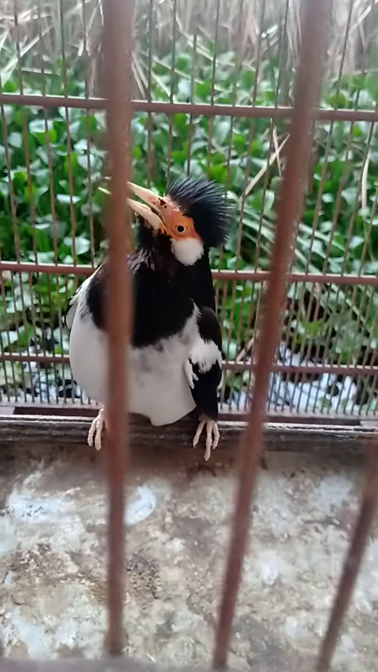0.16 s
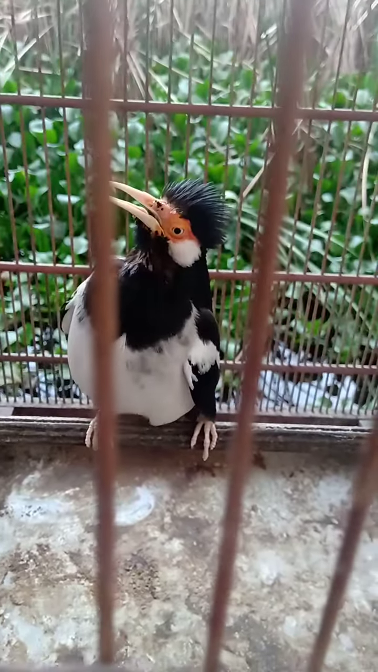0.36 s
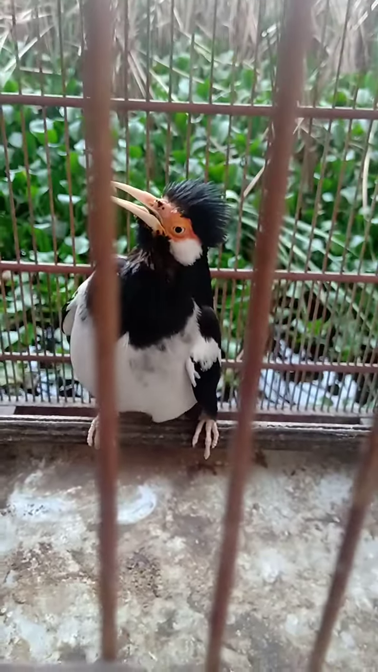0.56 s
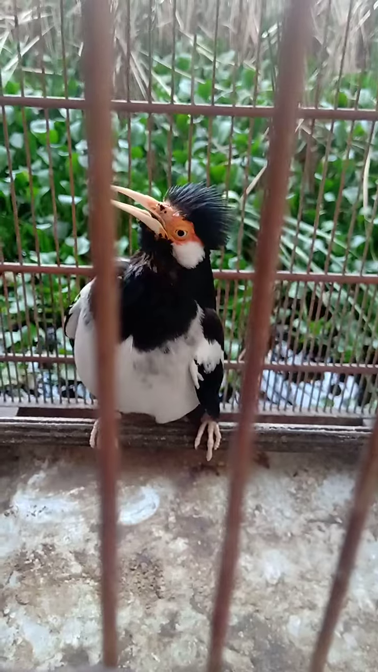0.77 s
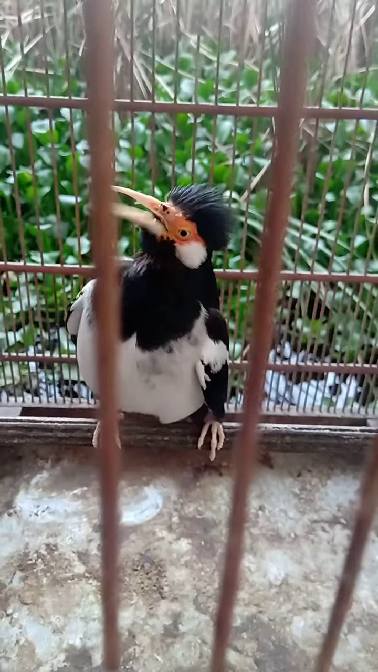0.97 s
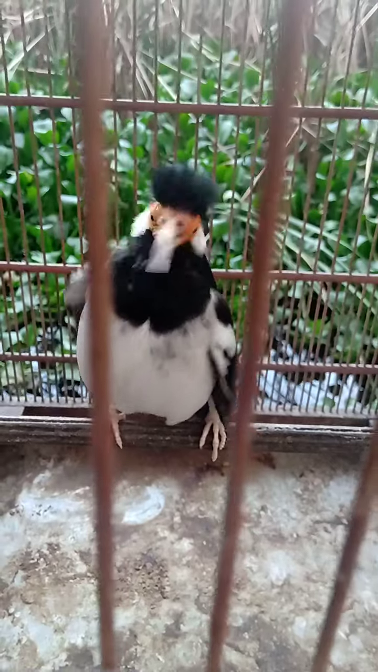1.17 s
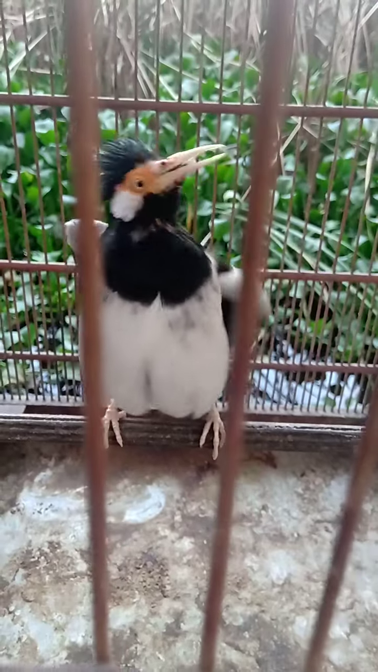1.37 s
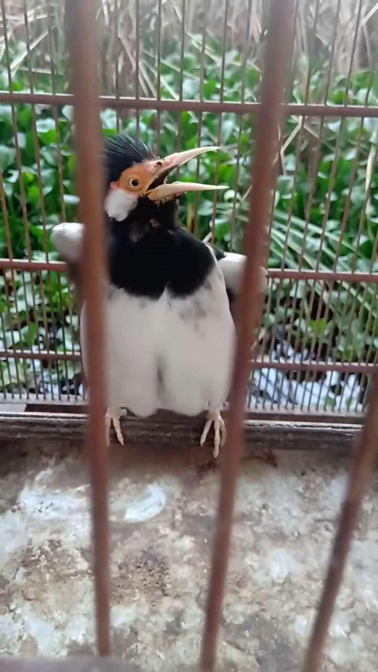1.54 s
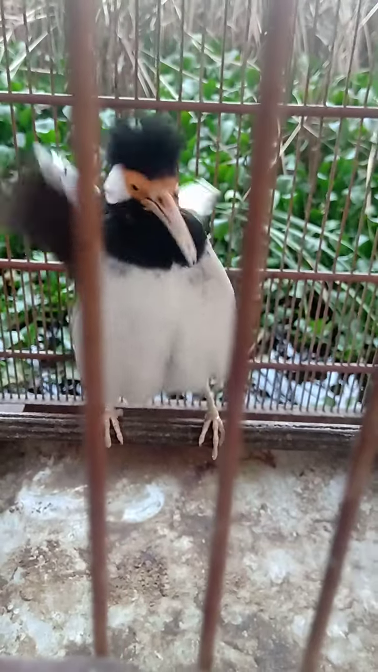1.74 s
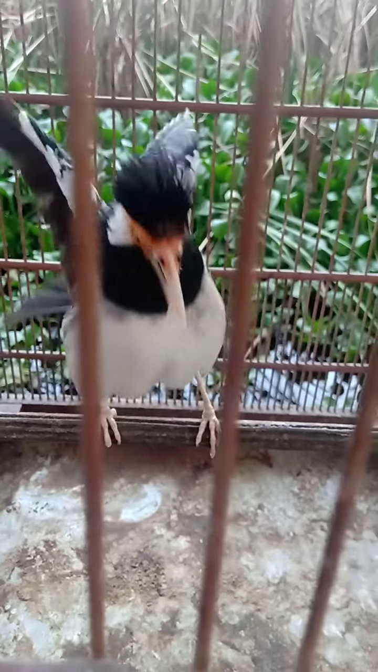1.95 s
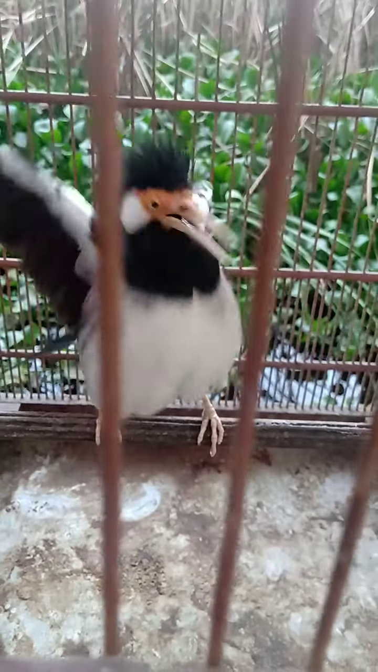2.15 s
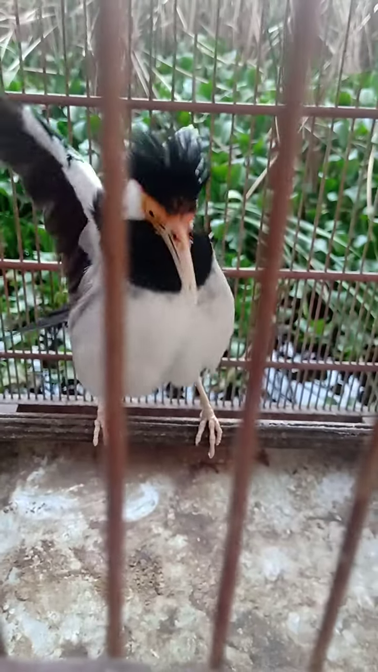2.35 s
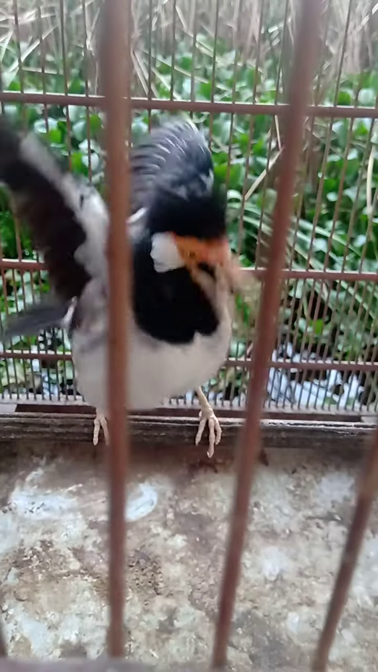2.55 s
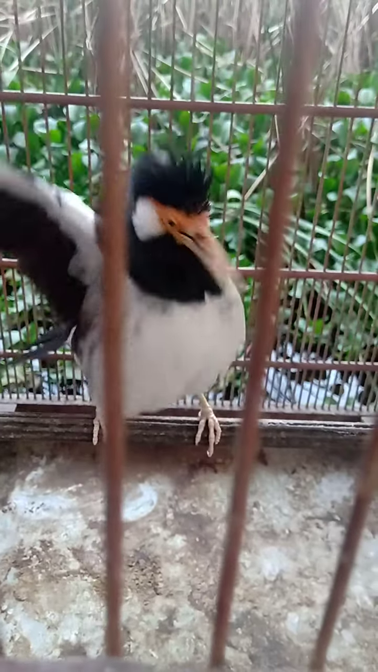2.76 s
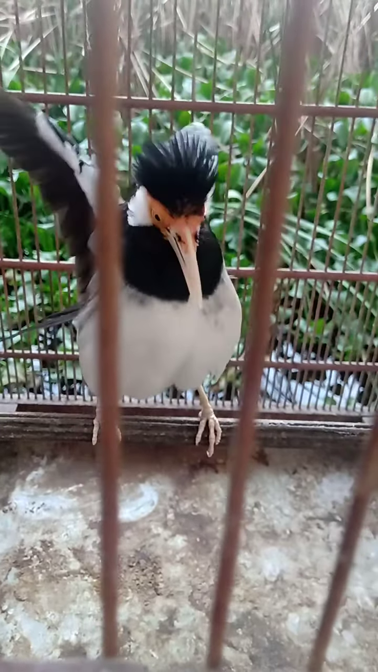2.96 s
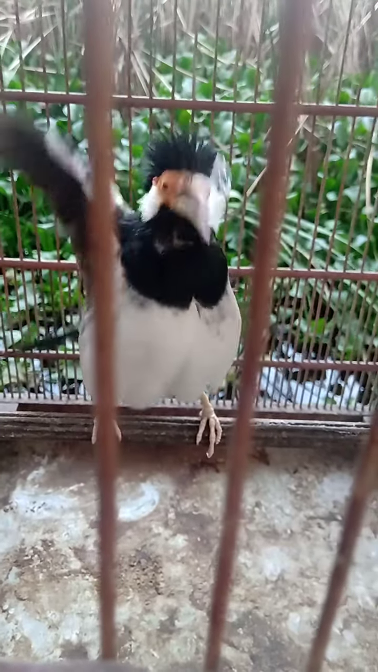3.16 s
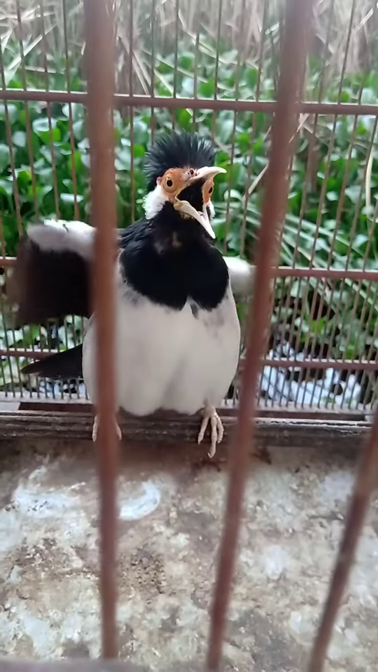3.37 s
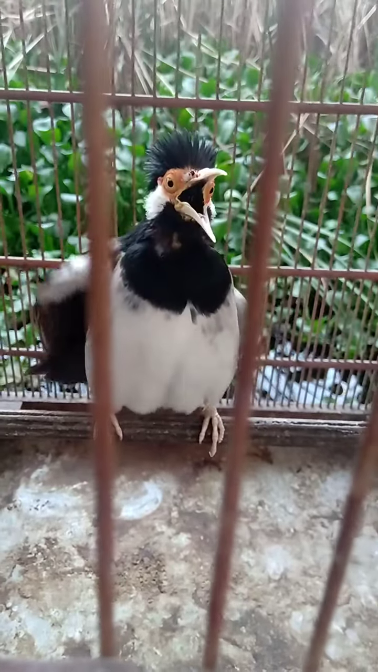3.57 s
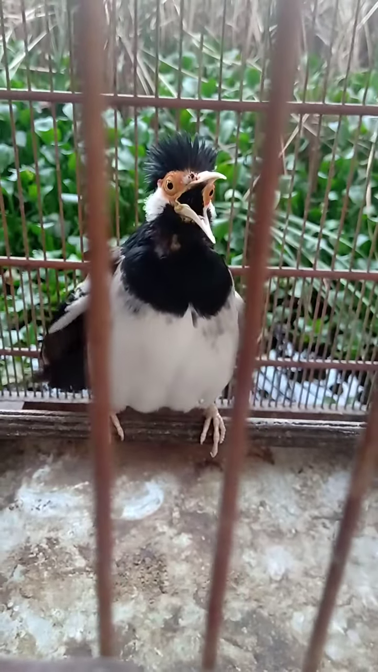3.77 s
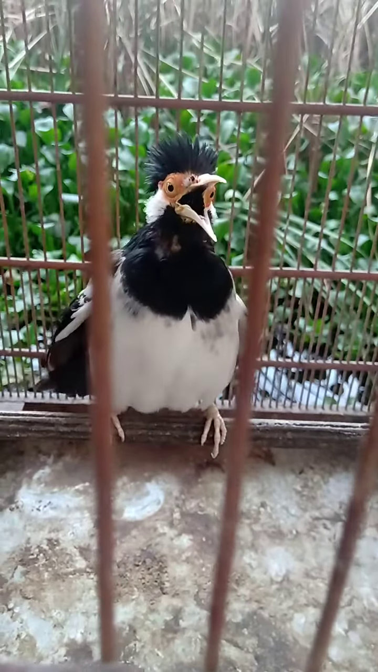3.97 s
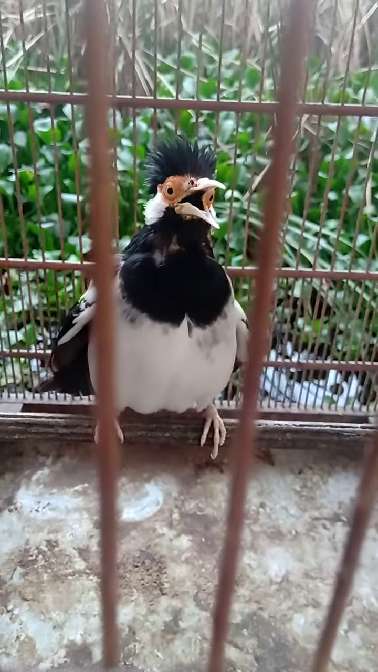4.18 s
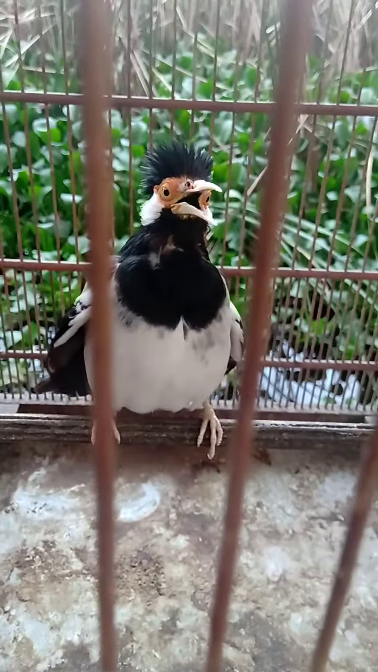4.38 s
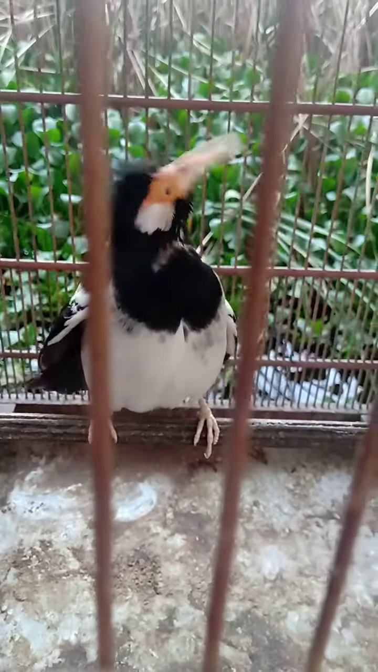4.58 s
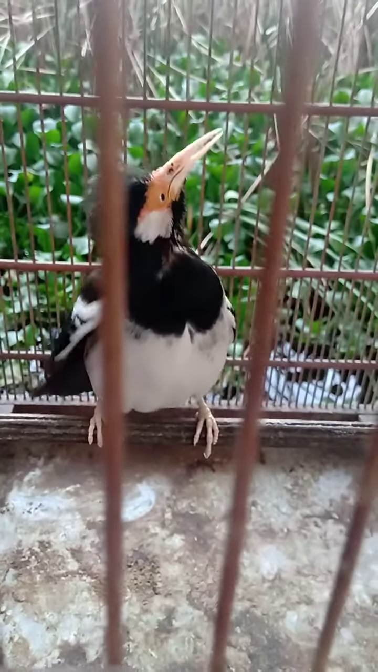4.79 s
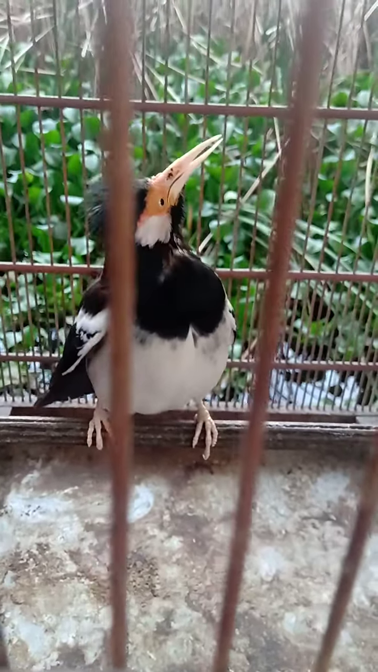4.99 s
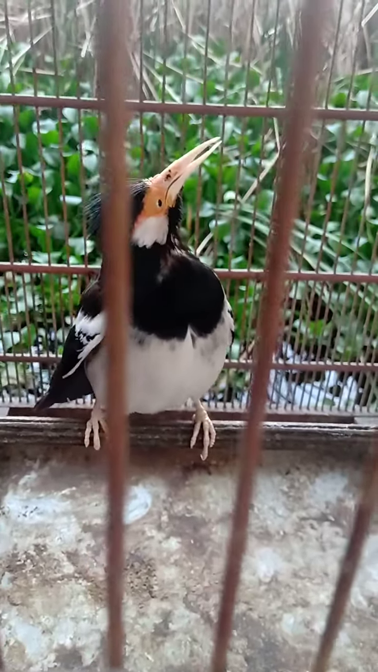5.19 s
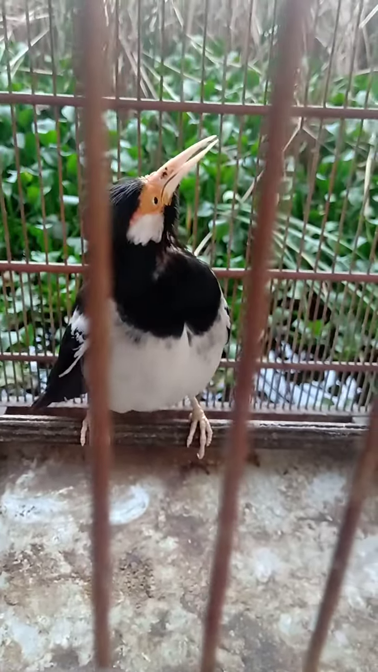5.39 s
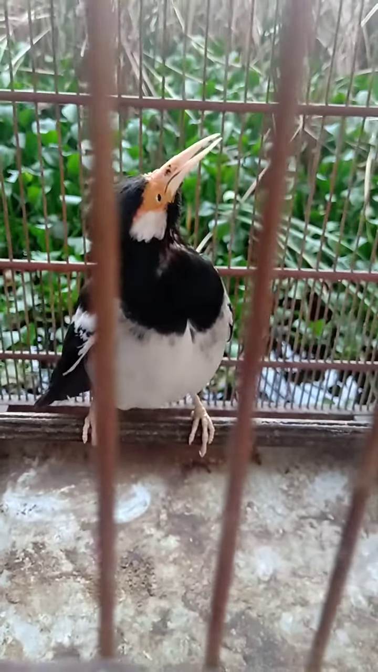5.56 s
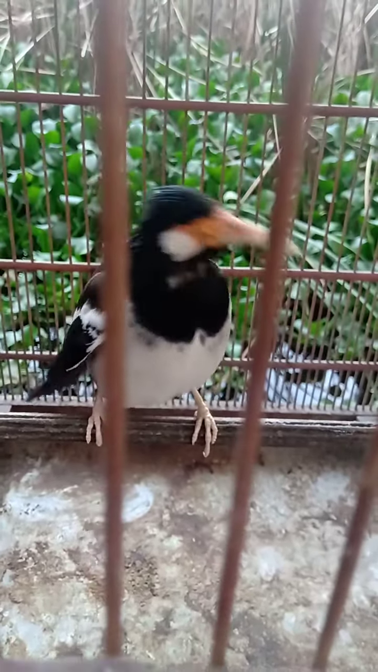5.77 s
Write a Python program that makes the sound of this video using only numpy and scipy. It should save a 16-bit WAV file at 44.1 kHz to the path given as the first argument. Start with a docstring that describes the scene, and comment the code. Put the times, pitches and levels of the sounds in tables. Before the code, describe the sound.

Close, high bird whistles sweep upward four times, followed by a quick raspy trill, with a soft outdoor rumble behind.

```python
"""Four rising whistles, then a fast rattling chatter: a caged pied starling close to a phone outdoors.
Each syllable uses both sides of the syrinx: a low reedy voice starts it, a high pure voice takes over,
warbling or pulsing. Cage and yard add short echoes. The phone's gain control ducks the low rumble,
the hiss and a few distant calls whenever the bird sings."""
import sys
import numpy as np
from scipy import signal
from scipy.fft import rfft, irfft
from scipy.io import wavfile
from scipy.ndimage import map_coordinates

SR = 44100
rng = np.random.default_rng(int(sys.argv[2]) if len(sys.argv) > 2 else 0)


def unload_audio(sound):
    """Save the sound as a 16-bit wav file, at the path given as the first command line argument."""
    columns = np.transpose(np.atleast_2d(sound))
    # keep every value between -1 and 1, then stretch to whole-number steps
    steps = np.round(np.clip(columns, -1, 1) * 32767)
    wavfile.write(sys.argv[1], SR, steps.astype(np.int16))


N = 257102
TIME = np.arange(N) / SR


def whistles(overlap_s=.001):
    """Four whistles; in each the pure voice takes over as the reedy one stops."""
    # Each row: start in s; reedy voice: length in s, end pitch in Hz, end level in dB, swell in dB,
    # scoop 0-1, creak in dB, odd partials in dB; pure voice: length in s, end pitch in Hz,
    # level in dB, warble rate in Hz.
    syllables = [(.960, 0.057, 2350, -16, 7, 0, 0, -10.5, 0.057, 6470, -6, 216.3),
                 (1.412, 0.084, 2247, -8, 15, .95, 4, -9, 0.054, 6110, -6.5, 214),
                 (1.935, .085, 2264, -7, 22.5, 0.98, 2.5, -5, 0.059, 6035, -6, 240),
                 (2.469, 0.085, 2264, -4.5, 30.5, .8, -3.5, -6.5, .062, 6073, -6, 269.5)]
    out = np.zeros(N)
    for start_s, length_s, hz, db, swell_db, scoop, creak_db, odd_db, *high_voice in syllables:
        add(out, start_s, reedy_voice(length_s, hz, db, swell_db, scoop, creak_db, odd_db))
        add(out, start_s + length_s - overlap_s, pure_voice(*high_voice))
    return out


def reedy_voice(length_s, end_hz, end_db, swell_db, scoop, creak_db, partials_db):
    """Low side of the syrinx: a creaky scoop that swells, rises and thins to its second partial."""
    scoop_hz, scoop_s, scoop_db, rise_hz_per_s = 677, .0115, -17.5, 1900
    creak_s, creak_hz, purify_db, purify_s = .016, 200, -47, .011
    t = clock(length_s)
    n = len(t)
    unsettled = np.exp(-t / scoop_s)  # the membrane shakes before it locks
    hz = end_hz - rise_hz_per_s * (length_s - t) - scoop * scoop_hz * unsettled
    creak = scoop * np.exp(-(t / creak_s) ** 4)
    db = end_db - swell_db * (1 - t / length_s)
    db += creak * (scoop_db - creak_db * np.cos(2 * np.pi * creak_hz * t))
    odd_db = partials_db - .64 * creak * scoop_db + purify_db * np.exp((t - length_s) / purify_s)
    jitter = .004 + .03 * unsettled * undb(odd_db)
    phase = turn(hz * (1 + jitter * wander(n, 1500)))
    reediness = undb(odd_db + 2.7 * wander(n, 400))
    odd_partials = undb(-9.5) * np.sin(phase) + np.sin(3 * phase)
    grit = undb(-6) * creak * np.sin(4 * phase)
    turbulence = (undb(-14) * unsettled + undb(-26)) * throat_noise(n)
    wave = np.sin(2 * phase) + reediness * (odd_partials + grit + turbulence)
    return np.sqrt(2) * undb(db + .9 * wander(n, 220)) * wave


def pure_voice(length_s, end_hz, level_db, warble_hz):
    """High side of the syrinx: a leap and a steep climb, with a fast, uneven warble that narrows."""
    leap_hz, leap_s, rise_hz_per_s, warble_depth_hz, warble_fade_s = 706, .01, 14000, 346, .049
    onset_db, flutter_db, release_db, release_s = -6, 2.5, -12, .0044
    t = clock(length_s)
    leap = np.exp(-(t / leap_s) ** 2)
    hz = end_hz - rise_hz_per_s * (length_s - t) - leap_hz * leap
    db = level_db + onset_db * leap + release_db * np.exp((t - length_s) / release_s)
    depth_hz = warble_depth_hz * np.exp(-(t / warble_fade_s) ** 2) * (1 - leap / 2)
    warble = np.sin(turn(warble_hz * (1 + .14 * wander(len(t), warble_hz))))
    phase = turn(hz + depth_hz * warble + 30 * wander(len(t), 710))
    return np.sqrt(2) * undb(db + flutter_db * wander(len(t), 2 * warble_hz)) * np.sin(phase)


def chatter(tone_lag_s=.0098, beak_hz=2000):
    """An opener, then rasp-and-tone notes, eleven a second; the small open beak radiates no lows."""
    # Each row: start in s, rasp level in dB, tone level in dB, tone pitch in Hz, tone length in s.
    notes = [(3.1956, -31, -7.5, 3852, 0.056), (3.279, -27.5, -8.5, 3900, 0.06),
             (3.3681, -27, -8, 3963, .057), (3.452, -30, -11.5, 3937, 0.056),
             (3.541, -26, -10, 3922, 0.051), (3.625, -27, -10.5, 3930, 0.053),
             (3.7118, -29.5, -11, 3950, 0.054), (3.801, -26.5, -10, 3908, .051),
             (3.893, -27, -9.5, 3915, 0.052), (3.988, -28.5, -12.5, 3890, 0.042)]
    out = np.zeros(N)
    add(out, *opener())
    swings_hz = np.linspace(25.1, 95, len(notes))
    for (start_s, rasp_db, tone_db, hz, length_s), swing_hz in zip(notes, swings_hz):
        add(out, start_s, rasp(rasp_db))
        add(out, start_s + tone_lag_s, pulsed_tone(hz, length_s, tone_db, swing_hz))
    return signal.sosfilt(signal.butter(6, beak_hz, "high", fs=SR, output="sos"), out)


def opener(clear_at_s=3.137, clearing_s=.0045):
    """Start time and sound of the first chatter note: hoarse, then clear with a weak octave."""
    # Each row: time in s, pitch in Hz, level in dB.
    contour = [(3.109, 3196, -36.5), (3.123, 2363, -36.5), (3.128, 3185, -30.5), (3.145, 3640, -13),
               (3.158, 3730, -13), (3.18, 3430, -33.5)]
    t, hz, db = track(contour)
    clear = 1 / (1 + np.exp((clear_at_s - t) / clearing_s))
    octave_db = -2 * (1 - clear) - 20.5 * clear
    roughness = .62 * (1 - clear) + .05 * clear
    return t[0], hoarse_voice(hz, db, octave_db, roughness)


def rasp(level_db, length_s=.042, start_hz=3002, top_hz=3737, climb_s=.023):
    """A clear blip, a quick dip in pitch and level, and a rough climb that clears just under the tone."""
    dip_at_s, dip_width_s, dip_hz, dip_db, blip_db = .009, .0038, 767, -10, 5
    rough_at_s, rough_width_s = .017, .012
    t = clock(length_s)
    dip = np.exp(-((t - dip_at_s) / dip_width_s) ** 4)
    blip = np.exp(-(t / dip_at_s) ** 4)
    hz = top_hz + (start_hz - top_hz) * np.exp(-(t / climb_s) ** 4) - dip_hz * dip
    db = level_db + dip_db * dip - blip_db * (1 - blip)
    octave_db = 2.5 - 4 * t / length_s
    roughness = .079 + .91 * np.exp(-((t - rough_at_s) / rough_width_s) ** 2)
    return hoarse_voice(hz, db, octave_db, roughness)


def pulsed_tone(pitch_hz, length_s, level_db, swing_hz):
    """The pure voice catches in three quick upward flicks, then trembles and fades; it sags, then lifts."""
    pulse_hz, pulsing_s, flick_hz, sag_at_share = 194, .0145, 150, .39
    onset_db, tremble_db, fade_db_per_s, release_db, release_s = -4, 1.3, -120, -14, .0092
    t = clock(length_s)
    n = len(t)
    catching = 1 / (1 + np.exp((t - pulsing_s) / .0018))
    pulse_phase = 2 * np.pi * pulse_hz * t
    gate = (1 - catching * (.5 + .5 * np.cos(pulse_phase))) ** 1.06
    hz = pitch_hz - swing_hz * np.cos(2 * np.pi * (t / length_s - sag_at_share)) + 55 * wander(n, 400)
    hz += catching * (130 * wander(n, 1500) - flick_hz * np.sin(pulse_phase))
    ends_db = onset_db * np.exp(-t * pulse_hz) + release_db * np.exp((t - length_s) / release_s)
    db = level_db + ends_db + fade_db_per_s * t + tremble_db * wander(n, 2 * pulse_hz)
    return np.sqrt(2) * gate * undb(db) * np.sin(turn(hz))


def hoarse_voice(hz, db, octave_db, roughness, jitter=.068, flutter_db=5.5):
    """A tone and its octave; roughness shakes it from cycle to cycle and lets turbulent air through."""
    n = len(hz)
    phase = turn(hz * (1 + jitter * roughness * wander(n, 2200)))
    gain = undb(db + flutter_db * roughness * wander(n, 1500))
    turbulence = roughness * undb(-5) * throat_noise(n)
    return np.sqrt(2) * gain * (np.sin(phase) + undb(octave_db) * np.sin(2 * phase) + turbulence)


def throat_noise(n, band_hz=(3000, 7000)):
    """Turbulent air in the throat, rms 1."""
    band = signal.butter(3, band_hz, "band", fs=SR, output="sos")
    return unit(signal.sosfilt(band, rng.standard_normal(n)))


def yard_echoes(x, cage_db=-24, cage_t60_s=.14, yard_db=-29, yard_t60_s=.3):
    """The cage and near walls return a quick cluster of echoes; the yard adds a faint tail."""
    echoes = undb(cage_db) * tail(cage_t60_s) + undb(yard_db) * tail(yard_t60_s)
    return x + signal.fftconvolve(x, echoes)[:N]


def rustle(at_s=.16, width_s=.089, db=-56):
    """A brief soft rustle before the song."""
    return air(1100, 8000) * undb(db) * np.exp(-((TIME - at_s) / width_s) ** 2)


def far_sounds(t60_s=.28):
    """Distant birds' rising slurs, faint hoots and a late low drone, blurred by their echoes."""
    # Each row: start in s, length in s, first pitch in Hz, last pitch in Hz, relative level in dB.
    slurs = [(4.356, .12, 5440, 6860, -54), (5.59, .20, 4840, 6140, -43)]
    # Each row: start in s, length in s, pitch in Hz, relative level in dB.
    hoots = [(2.15, 0.1, 677, -55.5), (2.41, 0.098, 663, -56.5), (3.08, 0.18, 633.4, -50.5),
             (3.35, 0.86, 549.3, -68), (4.06, 0.37, 516.1, -56), (4.92, 0.028, 598, -52),
             (5.06, 0.028, 582, -49)]
    # One row, columns as for the hoots.
    drone = (4.5, 1.05, 69.5, -50)
    out = np.zeros(N)
    for start_s, *slur in slurs:
        add(out, start_s, far_note(*slur, waver=.0205, waver_hz=486))
    for start_s, length_s, hz, db in hoots + [drone]:
        add(out, start_s, far_note(length_s, hz, hz, db, waver=.02, waver_hz=120))
    return .8 * out + .5 * signal.fftconvolve(out, tail(t60_s))[:N]


def far_note(length_s, first_hz, last_hz, db, waver, waver_hz):
    """A wavering tone that swells and fades in one arch while it glides."""
    share = clock(length_s) / length_s
    hz = first_hz + (last_hz - first_hz) * np.sin(np.pi / 2 * share) ** 2
    hz *= 1 + waver * wander(len(share), waver_hz)
    return np.sqrt(2) * undb(db) * np.sin(np.pi * share) * np.sin(turn(hz))


def background(rumble_db=-54.5, hiss_db=-55):
    """A rumble lifted by gusts and a flickering wash of far surroundings, under an even hiss."""
    # Each row: peak time in s, half length in s, rumble lift in dB.
    gusts = [(0.7, 0.22, 6), (2.498, 0.31, 2.5), (4.89, .3, 2)]
    # Each row: time in s, level of the low-mid wash in dB.
    wash_levels = [(0, -53.5), (1.35, -56.5), (1.9, -61.5), (3.7, -64.5), (4.2, -59.5), (5.83, -61)]
    gust_db = sum(db * np.exp(-((TIME - at_s) / half_s) ** 2) for at_s, half_s, db in gusts)
    wash_db = np.interp(TIME, *np.transpose(wash_levels))
    rumble = air(39, 163.3) * undb(rumble_db + gust_db + 2 * wander(N, 13))
    low_wash = air(270, 496) * undb(wash_db + 2 * wander(N, 20))
    mid_wash = air(600, 770) * undb(wash_db - 11 + 3 * wander(N, 15))
    hiss = air(835, 9800) * undb(hiss_db)
    return rumble + low_wash + mid_wash + hiss


def air(lo_hz, hi_hz):
    """One band of the outdoor noise spectrum, rms 1."""
    # Each row: frequency in Hz, relative noise density in dB.
    spectrum = [(24, -40.5), (40, -13), (54, -0.5), (76, 6.5), (205, 0), (318, -9), (355, -7), (443, -14),
                (577, -16), (898, -26), (6400, -17.5), (7800, -25), (10100, -88.5), (17200, -120)]
    hz, db = np.transpose(spectrum)
    bins_hz = np.maximum(np.fft.rfftfreq(N, 1 / SR), 1)
    band = ((1 + (lo_hz / bins_hz) ** 10) * (1 + (bins_hz / hi_hz) ** 10)) ** -.5
    colour = undb(np.interp(np.log(bins_hz), np.log(hz), db))
    return unit(irfft(rfft(rng.standard_normal(N)) * band * colour, N))


def tail(t60_s, n=40000, build_s=.012):
    """Diffuse echoes: noise of unit energy that builds up quickly and decays."""
    t = np.arange(n) / SR
    echoes = rng.standard_normal(n) * np.exp(-np.log(1000) * t / t60_s) * (1 - np.exp(-t / build_s))
    return echoes / np.sqrt(np.sum(echoes ** 2))


def add(out, start_s, x, attack_s=.003, release_s=.007):
    """Mix a sound in at its time; a membrane needs a few milliseconds to start and to stop."""
    t = np.arange(len(x)) / SR
    ramp = np.minimum(np.minimum(t / attack_s, (t[-1] - t) / release_s), 1)
    i = int(start_s * SR)
    x = (x * np.sin(np.pi / 2 * ramp) ** 2)[:N - i]
    out[i:i + len(x)] += x


def wander(n, hz):
    """Smooth random curve, spread near 1, changing about hz times a second."""
    steps = np.arange(n) * hz / SR
    return map_coordinates(rng.standard_normal(int(steps[-1]) + 2), [steps], order=3, mode="nearest")


def track(rows):
    """Join rows (s, values..) by straight lines: time, then each column, per sample."""
    times_s, *columns = np.transpose(rows)
    t = np.arange(times_s[0], times_s[-1], 1 / SR)
    return [t] + [np.interp(t, times_s, column) for column in columns]


def turn(hz):
    """Phase in radians along a pitch curve."""
    return 2 * np.pi * np.cumsum(hz) / SR


def clock(length_s):
    """Sample times of a note in s."""
    return np.arange(int(length_s * SR)) / SR


def undb(db):
    """Decibels to gain."""
    return 10 ** (np.asarray(db) / 20)


def unit(x):
    """Scale to rms 1."""
    return x / np.sqrt(np.mean(x ** 2))


def scene():
    """The bird in its yard, in front of the far sounds."""
    return (yard_echoes(whistles() + chatter()) + rustle() + far_sounds() + background())[None]


def gain_control(x, threshold_db=-27, slope=.63, window_s=.025, release_s=.013, lookahead_s=.004):
    """Turns everything down as the smoothed power passes the threshold; recovers quickly."""
    window = np.hanning(int(window_s * SR))
    power = np.maximum(signal.fftconvolve(x ** 2, window / window.sum(), "same"), 0)
    pole = np.exp(-1 / (release_s * SR))
    held = signal.lfilter([1 - pole], [1, -pole], power)
    ahead = np.interp(TIME + lookahead_s, TIME, held)
    return x * (1 + ahead / undb(threshold_db) ** 2) ** (-slope / 2)


def record(dry):
    """The phone rides its gain and cuts the top."""
    top_hz = 7900
    lowpass = signal.butter(22, top_hz, fs=SR, output="sos")
    return signal.sosfilt(lowpass, gain_control(dry[0]))[None]


dry = scene()
out = record(dry)
unload_audio(out)
```